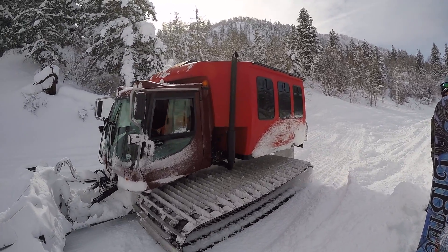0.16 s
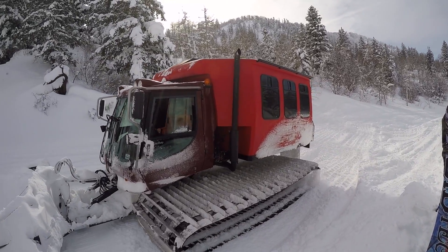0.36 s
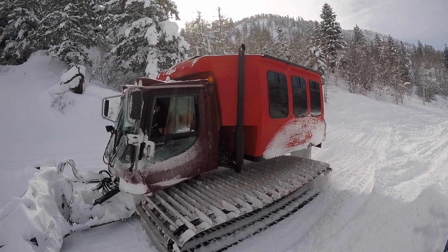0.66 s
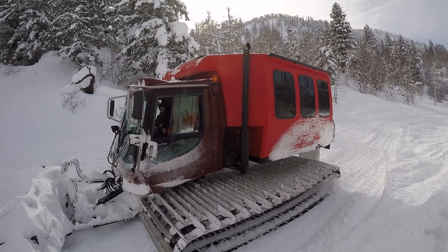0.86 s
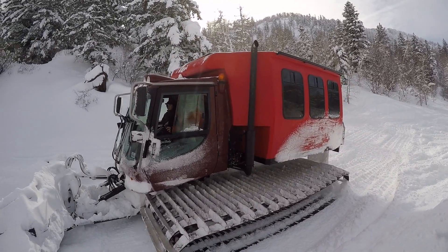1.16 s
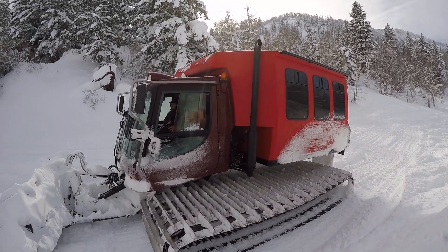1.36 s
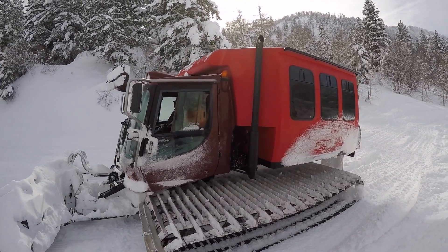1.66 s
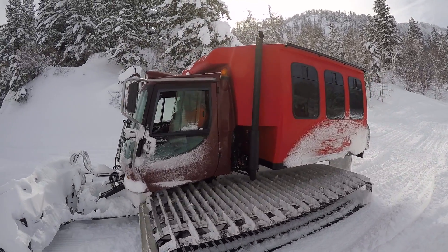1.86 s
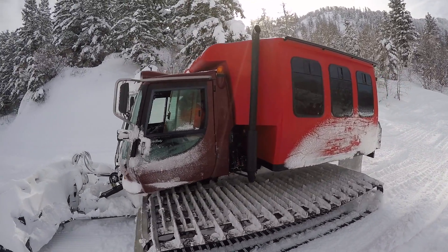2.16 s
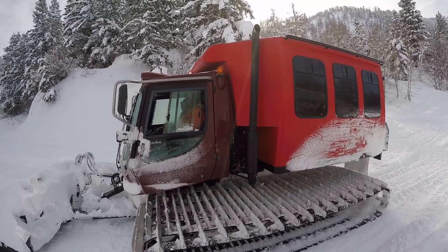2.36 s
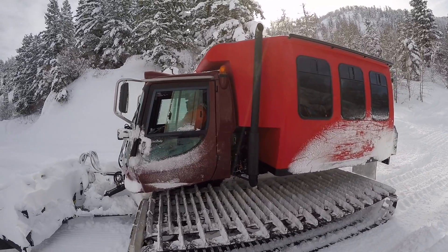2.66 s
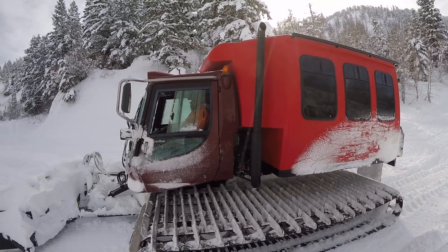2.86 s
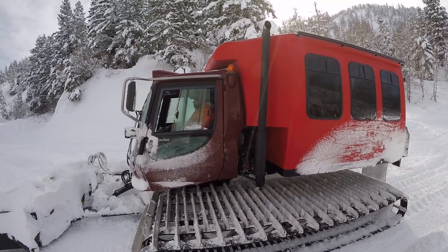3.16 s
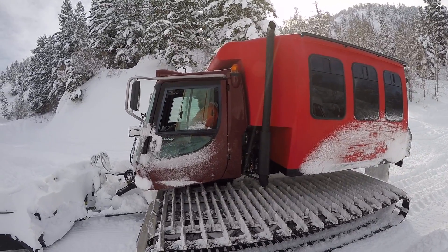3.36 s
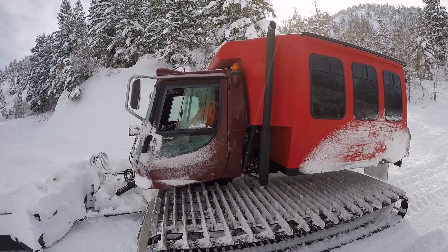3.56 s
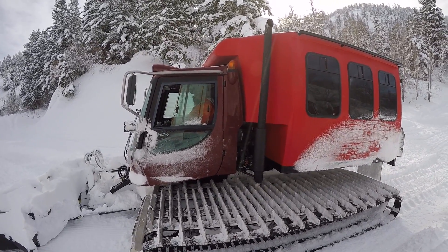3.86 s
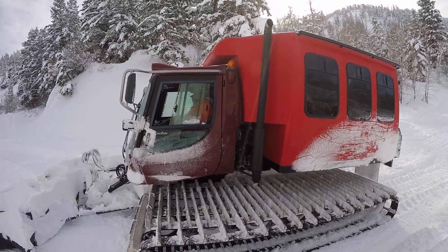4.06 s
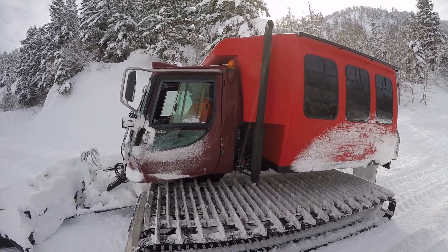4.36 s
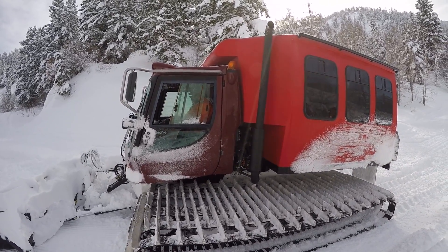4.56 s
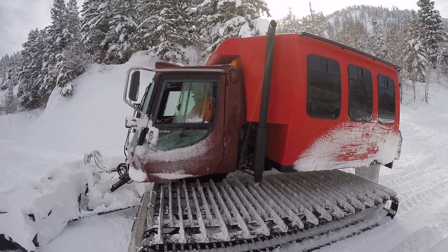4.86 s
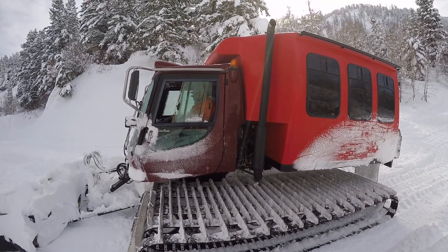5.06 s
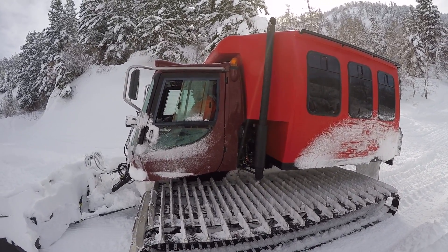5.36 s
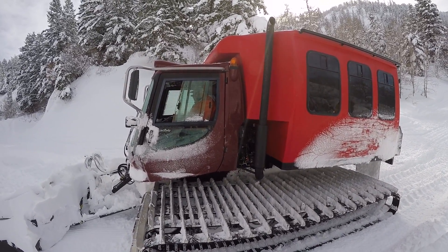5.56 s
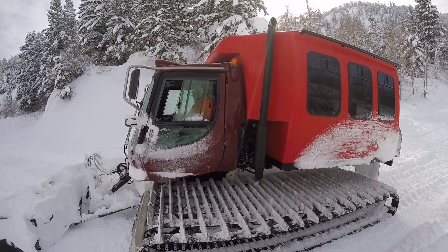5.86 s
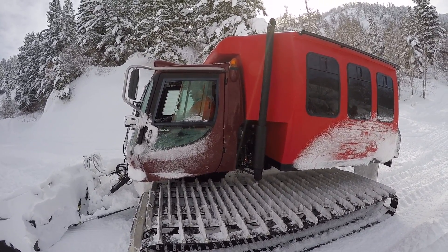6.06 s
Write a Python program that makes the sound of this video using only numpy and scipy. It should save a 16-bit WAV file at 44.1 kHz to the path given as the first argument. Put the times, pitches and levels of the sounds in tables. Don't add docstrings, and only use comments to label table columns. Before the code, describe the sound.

A large diesel tracked snow vehicle is heard close by in open air. From 0 to 2.6 seconds it runs at working revs: a low drone near 65 pulses a second, dense knocking clatter, air hiss, tracks grinding snow and a thin turbo whistle that dips, then rises as effort swells around 1.5 to 2. Small chains chatter from about 1.1, loose steel jingles after 2.1. At 2.6 to 3.1 the revs tumble and a drive whine slides downward and vanishes; the whistle dies by about 4. A softer, lumpy idle near 38 pulses continues to the end at 6.2, with scattered link clinks and a tiny snow crunch at 4.5. Throughout, deep rumble and soft thumps shake the handheld microphone; sharper plastic knocks land near 0.3, 2.15, 3.0, 3.7, 3.9, strongest at 5.05, and faintly at 6.17.

```python
import sys
import numpy as np
from scipy import signal
from scipy.fft import rfft, irfft, next_fast_len
from scipy.io import wavfile
from scipy.ndimage import uniform_filter1d, map_coordinates

SR = 44100
rng = np.random.default_rng(int(sys.argv[2]) if len(sys.argv) > 2 else 0)


def gain_from_db(level_db):
    decades = np.asarray(level_db, float) / 20
    return 10 ** decades


def to_wav(sig):
    pcm = np.clip(np.atleast_2d(sig), -1, 1) * 32767
    pcm = np.round(pcm).astype(np.int16)
    wavfile.write(sys.argv[1], SR, pcm.T)


N = 273861

# time in seconds, firings per second, exhaust level in dB, effort in dB over idle.
ENGINE = [(0, 64.3, -30, 5.5), (.35, 65.9, -28.5, 4), (.8, 63.5, -27.5, 4.5), (1.2, 64.7, -28, 6),
          (1.68, 66.2, -28.5, 9.5), (1.85, 66.4, -29.5, 10), (2.2, 66, -23.5, 7), (2.49, 66, -24.5, 7),
          (2.72, 59.3, -33, 7), (2.82, 58, -31.5, 4.5), (2.86, 56.5, -55, 2.5), (2.99, 48.6, -54, 1.2),
          (3.08, 45.4, -45, 1.5), (3.2, 42.3, -34.5, 0), (3.35, 40.2, -46, 0.5), (3.6, 38.4, -32.5, 0.5),
          (4.0, 37.5, -36, -0.1), (5.0, 37.4, -35, 0.1), (6.21, 37.4, -41.5, .3)]
CYLINDER_DB = [-0.75, -1.3, -1.9, -2.1, -1.6, -1.3]
# firings per second, gain in dB.
PIPE_GAP = [(41, 0.5), (45, -17), (56, -10), (58.5, -0.5)]
# multiple of the shaft rate, level in dB.
GEARS = [(9.76, 5), (8.08, 6.5), (14.36, -4), (15.54, 0), (18.1, -5), (18.68, -8), (22.36, -6)]
# multiple of the firing rate, level in dB.
MESH = [(19.6, 3.5), (21.9, -2), (27.4, 0), (29.5, -3), (35.9, -7)]
# middle in seconds, level in dB, half length in seconds.
FAN_BITES = [
    (1.0, -61.5, 0.18),
    (1.62, -54, 0.37),
    (2.93, -52, 0.062),
    (3.14, -48.5, 0.061),
    (3.44, -45.5, 0.23),
    (3.76, -53, 0.13),
]

# frequency in Hz, density in dB per Hz.
BLOCK_IDLE = [(290, -14.5), (500, -10.5), (656, -6.5), (714, -10), (804, -7.5), (868, -5), (994, -7.5),
              (1240, -14), (1400, 0.5), (1820, -5), (2250, -1.5), (2550, -4.5), (2900, -0.5), (3800, -16),
              (4940, -43), (8360, -120)]
# frequency in Hz, density in dB per Hz.
BLOCK_LOADED = [(290, -21), (500, -7), (573, -10.5), (667, -4.5), (771, -9.5), (1000, -2), (1220, -21),
                (1250, -10), (1410, 0), (1600, -1.5), (1930, 0), (2080, -2.5), (3130, -4.5), (3800, -20),
                (4940, -52), (8360, -120)]
# frequency in Hz, density in dB per Hz.
VALVES = [(2120, -28), (3600, -17), (4070, -0.5), (4750, 0.5), (5370, -5), (5970, -0.5), (6180, -4.5),
          (6420, -7), (6490, -9), (7000, -17.5), (9100, -35), (15400, -120)]
# time in seconds, cowl pitch in Hz, cowl level in dB,
# rocker cover pitch in Hz, rocker cover level in dB.
TURNING = [(0, 1697, -41, 4820, -47), (.35, 1766, -43, 4700, -54.5), (1.0, 1872, -44, 4600, -58),
           (1.1, 1910, -42, 4790, -47.5), (1.97, 1881, -46, 4790, -48), (2.12, 1927, -44, 4520, -57),
           (2.78, 2029, -46, 4500, -68), (2.95, 1992, -47.5, 4150, -53.5), (4.2, 1984, -45, 4200, -53),
           (5.2, 2040, -46, 4380, -51), (6.21, 2031, -47, 4370, -51)]
# frequency in Hz, density in dB per Hz.
HISS = [(3820, -17.5), (6500, -6), (7030, -5), (7800, -2), (8870, -10), (10600, -11.5), (13200, -18),
        (15200, -17.5)]
# frequency in Hz, density in dB per Hz.
TRACK = [(76, -44), (130, -3.5), (177, -5.5), (382, -10.5), (440, -15), (515, -22), (969, -15.5),
         (1200, -19.5), (1560, -71), (2640, -120)]
# middle in seconds, level in dB, half length in seconds.
SURGES = [
    (.19, -43, 0.31),
    (1.35, -49.5, 0.17),
    (1.75, -40, 0.35),
    (2.6, -55, 0.074),
    (3.0, -53, 0.18),
]
# middle in seconds, level in dB, half length in seconds.
LINKS = [
    (1.4, -65, .25),
    (1.7, -63, .1),
    (2.3, -51.5, 0.21),
    (2.7, -58, 0.18),
    (3.0, -71, .08),
]

# frequency in Hz, level in dB.
PANELS = [(974.5, -60.5), (1870, -64.5), (2021, -60)]
# time in seconds, whistle pitch in Hz.
TURBO = [(0, 6690), (.33, 6700), (.45, 6590), (.76, 6190), (1.1, 5890), (1.37, 5900), (1.55, 6030),
         (1.9, 6350), (2.06, 6415), (2.36, 6060), (2.75, 5650), (3.15, 5080), (3.45, 4600), (3.8, 4350)]
# time in seconds, pitch in Hz, level in dB.
WHINE = [(2.55, 2262, -60), (2.6, 2240, -44.5), (2.65, 2195, -50), (2.7, 2160, -44.5), (2.73, 2145, -48),
         (2.79, 2120, -42), (2.83, 2070, -46), (2.87, 1975, -43), (2.92, 1870, -45), (2.95, 1810, -50),
         (3.0, 1738, -50), (3.08, 1639, -62)]
# centre in Hz, width in Hz, lift in dB.
DUCT = [(6160, 60, 15), (6260, 70, -5), (6350, 50, 12), (6412, 30, -5), (6050, 40, 5), (5700, 150, -4),
        (5900, 100, 2), (6580, 100, 4), (6700, 60, 0), (4600, 200, 10)]

# frequency in Hz, density in dB per Hz.
DEEP = [(4.7, -33), (8.0, 5), (27, 0), (70, -21.5), (91, -68), (150, -120)]
# frequency in Hz, density in dB per Hz.
UPPER = [(29, -11.5), (50, 2), (86, -7), (103, -10), (156, -16.5), (200, -27), (260, -54), (440, -120)]
# middle in seconds, deep level in dB, upper level in dB.
GUSTS = [(.05, -45, -23), (.22, -18, -32), (.33, -18, -17), (0.431, -18, -28), (.64, -25, -17),
         (1.0, -20, -34), (1.28, -34, -36), (1.73, -25, -29), (1.97, -26, -46), (2.09, -28, -35),
         (2.31, -18, -26), (2.61, -37, -20), (2.73, -44, -45), (2.882, -18.5, -38), (3.1, -26, -48),
         (3.3, -24, -39), (3.53, -20, -49), (3.682, -10, -28), (3.95, -24, -31), (4.1, -25, -30),
         (4.24, -18.5, -41), (4.4, -34, -42), (4.599, -58, -43), (4.8, -38, -52), (5.07, -3.5, -29),
         (5.33, -21, -44), (5.5, -24, -34), (5.621, -26, -50), (5.82, -36, -48), (6.2, -17, -23)]
# time in seconds, pitch in Hz, level in dB.
SIZZLE = [(0, 12300, -72), (.4, 12000, -82), (1.1, 10800, -73), (1.6, 10200, -73), (1.92, 10700, -67),
          (2.3, 10600, -76), (2.6, 12200, -76), (3.3, 12300, -74), (4.6, 12000, -77), (5.2, 12400, -68),
          (5.45, 12500, -70), (5.6, 12700, -80), (6.21, 12500, -80)]
# frequency in Hz, density in dB per Hz.
FLOOR = [(4120, -36), (7000, -3), (7540, -1), (8130, -3), (10500, -3.5), (12000, -4.5), (13400, -5),
         (14700, -8), (15200, -7.5)]

# middle in seconds, level in dB, pitch in Hz, signed direction.
THUMPS = [(.222, -8, 24, -1), (.327, -3, 48.8, 0.91), (0.424, -6, 31.8, 1), (.65, -8.5, 49.5, 0.91),
          (1.027, -8.5, 30, -0.97), (1.744, -9.5, 45, 0.97), (2.265, -8, 28, 1), (3.272, -11, 60, -1),
          (3.92, -9, 100.2, 1), (5.0525, -12.5, 110, 1), (5.334, -14.5, 39.6, -0.87),
          (0.989, -4, 34.72, -0.65), (1.273, -3, 35, 0.51), (2.325, -0.5, 42.38, 0.74),
          (3.014, -5.5, 68, 0.48), (3.298, -14, 69, -0.95), (3.677, -8.5, 70, 1), (3.685, -6, 60, -1),
          (4.251, -13.5, 45.37, 0.78), (5.06, -5, 61.5, 0.79), (5.068, -6.5, 59.2, -1.3),
          (5.09, -7, 39.8, 0.96), (5.508, -11, 75, 0.97), (5.516, -3.5, 54.5, -0.5), (6.18, -7, 80, -1.02),
          (6.189, -17, 60.1, 0.78)]
# start in seconds, push level in dB, push pitch in Hz, dull tick level in dB,
# bright tick level in dB.
KNOCKS = [(.2955, -8, 110, -30, -42), (.7205, -20, 110, -40, -45), (2.1385, -6, 110, -27, -36),
          (2.1585, -6, 110, -25, -38), (3.0082, -19, 200, -17.5, -45), (6.174, -23, 100, -46, -55),
          (3.6698, -16, 170, -33, -26), (3.9168, -7, 104, -22.5, -26), (5.033, .6, 112, -28, -24.5),
          (5.0513, -6.5, 125, -21, -38), (5.0565, -26, 150, -34, -40)]
# centre in Hz, width in Hz, level in dB.
SHELL = [(760, 550, 1.5), (1400, 500, -11)]
# centre in Hz, width in Hz, level in dB.
LATCH = [(2100, 600, 2), (3750, 330, 7), (6200, 800, -19)]
# start in seconds, level in dB, pitch in Hz.
SNAPS = [(3.6694, -17, 1880), (3.6725, -26, 1900), (3.9163, -21, 2370), (5.0318, -24, 2150),
         (5.0498, -24, 2450), (5.0555, -29, 2450), (5.07, -33, 2000), (3.9155, -11, 500),
         (5.0313, -13, 450), (5.0497, -13, 520), (.2942, -18, 480), (2.1372, -17, 480), (2.1572, -17, 480)]

# start in seconds, peak level in dB, pitch in
# Hz.
JINGLES = [(2.128, -33, 4650), (2.2048, -30, 4550), (2.3236, -30, 4500), (2.4943, -29.5, 4600),
           (2.6875, -29.5, 4520), (4.349, -34, 4200), (5.0936, -34, 4160), (5.1751, -35, 4190),
           (5.2546, -32, 4520), (5.3676, -33, 4510), (5.5757, -38, 4420), (6.0325, -34.5, 4280),
           (1.6781, -36, 4370), (1.8223, -37, 4100), (2.2503, -34, 4080), (2.4065, -40, 4180),
               (2.9767, -38, 4140), (3.1019, -33.5, 4180), (3.244, -36, 4130), (3.3453, -39, 4180),
               (3.3967, -37, 4150), (3.4965, -33, 4190), (3.7295, -39, 4140), (3.8646, -41, 4300),
               (3.9739, -43.5, 4130), (4.1066, -41, 4150), (4.668, -39, 4610), (4.8773, -39, 4480),
               (4.9317, -36, 4270), (5.229, -34, 4350), (5.7359, -38, 4200), (5.8715, -41, 4380),
               (6.1614, -34, 4430),
           (1.0876, -37, 4770), (1.1196, -29, 4700), (1.2957, -31, 4790), (1.3545, -37, 4970),
          (1.4463, -37, 4770), (1.4942, -34, 4910), (1.5381, -35, 4830), (1.6094, -36, 4750),
          (1.6723, -31, 4930), (1.7496, -36, 4910), (1.825, -35, 4740), (1.9033, -36, 4820)]
# middle in seconds, level in dB, length in seconds, lowest frequency in Hz.
CRUNCH = [
    (2.61, -60, .035, 13500),
    (2.827, -48, .0015, 5500),
    (4.512, -41, 0.0032, 1800),
    (4.517, -36, 0.0065, 1776),
]
DULLED_S = [2.876, 3.476, 3.66, 3.906, 4.01, 4.24, 5.005, 5.51, 6.18]


def unit(x):
    return x / np.sqrt(np.mean(x ** 2) + 1e-20)


def curves(rows):
    s, *cols = np.transpose(rows)
    return [np.interp(np.arange(N) / SR, s, c) for c in cols]


def wobble(rate_hz):
    knots = rng.standard_normal(int(N * rate_hz / SR) + 4)
    return map_coordinates(knots, [np.arange(N) * rate_hz / SR])


def filtered(x, response):
    m = next_fast_len(N + SR // 2)
    return irfft(rfft(x, m) * response(np.fft.rfftfreq(m, 1 / SR)), m)[:N]


def coloured(x, spectrum):
    f, db = np.transpose(spectrum)
    return unit(filtered(x, lambda hz: gain_from_db(np.interp(np.log(hz + 1), np.log(f + 1), db))))


def patchy(depth_db):
    z = signal.stft(rng.standard_normal(N), nperseg=512)[2]
    field = uniform_filter1d(rng.standard_normal(z.shape), 5, 0)
    field = uniform_filter1d(field, 7, 1)
    return signal.istft(z * gain_from_db(depth_db * unit(field)), nperseg=512)[1][:N]


def tone(turns, unsteady_db, drift_rad):
    level = np.sqrt(2) * gain_from_db(unsteady_db * wobble(9))
    return level * np.sin(2 * np.pi * turns + drift_rad * wobble(14))


def ridge(drive, hz, width_hz):
    def slow():
        return filtered(drive * rng.standard_normal(N), lambda f: 1 / (1 + 2j * f / width_hz) ** 2)

    phase = 2 * np.pi * np.cumsum(hz) / SR
    return unit(slow() * np.cos(phase) + slow() * np.sin(phase))


def modes(x, table):
    def ring(f):
        return sum(gain_from_db(db) * 1j * f * w / (c * c - f * f + 1j * f * w) for c, w, db in table)

    return filtered(x, lambda f: ring(f) / (1 + 1j * f / 5000) ** 3)


def swells(rows, floor_db, order):
    t = np.arange(N) / SR
    return gain_from_db(floor_db) + sum(gain_from_db(db) * np.exp(-np.abs((t - s) / half_s) ** order) for s, db, half_s in rows)


def engine_effort_db():
    return curves(ENGINE)[2]


def pulling():
    return np.clip((curves(ENGINE)[0] - 45) / 18, 0, 1)


def beat(firings, floor, decay, scatter_db):
    index = np.floor(firings).astype(int)
    size_db = np.take(CYLINDER_DB, index % len(CYLINDER_DB))
    size_db = size_db + scatter_db * rng.standard_normal(N // 100)[index - index[0]]
    u = firings % 1
    return floor + gain_from_db(size_db) * (1 - np.exp(-u / 0.096)) * np.exp(-u / decay)


def exhaust(firings):
    rate, boom_db, effort_db = curves(ENGINE)
    third_db = -54.5 + 14 * np.interp(rate, [38.8, 56.6], [0, 1])
    fourth_db = -49.5 + 0.45 * effort_db + np.interp(rate, *np.transpose(PIPE_GAP))
    boom = tone(2 * firings, 0.58, 0.2) + gain_from_db(-1.5) * tone(firings, 1.8, 0.37)
    third = gain_from_db(third_db) * tone(3 * firings, 1.5, 0.2)
    fourth = gain_from_db(fourth_db) * tone(4 * firings, 1.5, 0.2)
    return gain_from_db(boom_db) * boom + third + fourth


def fan_and_gears(firings):
    effort_db = engine_effort_db()
    shaft = firings / len(CYLINDER_DB) * 2
    gears = sum(gain_from_db(db) * tone(k * shaft, 1.3, 0.15) for k, db in GEARS)
    mesh = sum(gain_from_db(db) * tone(k * firings, 5.9, 0.44) for k, db in MESH)
    fan = swells(FAN_BITES, -63.5, order=6) * tone(19.7 * shaft, 2.2, 0.07)
    return gain_from_db(-66.5 + 1.56 * effort_db) * gears + gain_from_db(-74 + 1.96 * effort_db) * mesh + fan


def clatter(firings):
    effort_db, load = engine_effort_db(), pulling()
    cowl_hz, cowl_db, cover_hz, cover_db = curves(TURNING)
    knock = beat(firings, 0.74, 0.23, 0.4) * patchy(1.0)
    block = load * coloured(knock, BLOCK_LOADED) + (1 - load) * coloured(knock, BLOCK_IDLE)
    valves = coloured(beat(firings, 1.0, 0.27, 5.1) * patchy(1.5), VALVES)
    cowl = ridge(beat(firings, 0.36, 0.32, 3.5), cowl_hz, 470)
    alternation_db = 0.89 * np.cos(np.pi * firings)
    cover_drive = beat(firings, 0.033, 0.77, 1.6) * gain_from_db(1.2 * wobble(21.9) + alternation_db)
    cover = ridge(cover_drive, cover_hz, 520)
    core = gain_from_db(-44 + effort_db) * block + gain_from_db(-53 + 0.95 * effort_db) * valves
    return core + gain_from_db(cowl_db) * cowl + gain_from_db(cover_db) * cover


def air_hiss(firings):
    hiss = coloured(beat(firings, 0.83, 0.29, 5.4) * patchy(1.0), HISS)
    return gain_from_db(-63 + engine_effort_db() + 1.3 * pulling()) * hiss


def tracks():
    grind = coloured(gain_from_db(1.0 * wobble(25)) * patchy(0.43), TRACK)
    links = ridge(gain_from_db(2.56 * wobble(35)), np.full(N, 4110), 220)
    return swells(SURGES, -51.5, order=2) * grind + swells(LINKS, -89, order=2) * links


def panels(firings):
    t = np.arange(N) / SR
    hum = sum(gain_from_db(db) * tone(hz * t, 0.92, 0.16) for hz, db in PANELS)
    since = (firings - 1.1) % len(CYLINDER_DB)
    ping = 0.04 + since * np.exp(-since / 0.3) * 4
    return hum + gain_from_db(-38.5) * ping * tone(1430 * t, 2.2, 0.4)


def ducted_whistle(hz, db, flicker_db):
    hz = uniform_filter1d(hz, size=2000)
    db = db + sum(lift_db / (1 + (2 * (hz - c) / w) ** 2) for c, w, lift_db in DUCT)
    db = db + flicker_db * wobble(35) + 0.8 * wobble(11)
    return gain_from_db(db) * tone(np.cumsum(hz) / SR, 0.29, 0.76)


def turbo():
    fade_s = np.maximum(np.arange(N) / SR - 3.55, 0)
    boost_db = np.minimum(engine_effort_db(), 8.3)
    return ducted_whistle(curves(TURBO)[0], -74.5 + 2.1 * boost_db - 70 * fade_s, 3.3)


def buffet():
    half_s, load = 0.036, pulling()
    deep_gusts = [(s, db, half_s) for s, db, _ in GUSTS]
    upper_gusts = [(s, db, 0.49 * half_s) for s, _, db in GUSTS]
    deep_gain = swells(deep_gusts, -22.5 + 1.5 * load, order=2)
    upper_gain = swells(upper_gusts, -34 + 4.5 * load, order=2)
    lumps = wobble(12)
    deep = coloured(rng.standard_normal(N), DEEP)
    deep = deep / np.sqrt(np.abs(uniform_filter1d(deep ** 2, size=5000)) + 0.082)
    upper = coloured(rng.standard_normal(N), UPPER)
    upper = upper / np.sqrt(np.abs(uniform_filter1d(upper ** 2, size=2500)) + 0.3)
    return deep_gain * gain_from_db(0.51 * lumps) * deep + upper_gain * gain_from_db(2.1 * lumps) * upper


def sizzle():
    hz, db = curves(SIZZLE)
    return gain_from_db(db) * ridge(gain_from_db(1.2 * wobble(8)), uniform_filter1d(hz, size=4000), 1000)


def microphone_hiss():
    return gain_from_db(-60.0) * coloured(rng.standard_normal(N), FLOOR)


def thumps():
    out, t = np.zeros(N + SR), np.arange(SR // 20) / SR
    middle_s = t[-1] / 2
    for s, db, hz, direction in THUMPS:
        u = (t - middle_s) * hz
        swing = np.sin(2 * np.pi * u) * np.exp(-(u / 0.42) ** 2)
        out[round((s - middle_s) * SR):][:len(t)] -= direction * gain_from_db(db - 1.5) * swing
    return out[:N]


def push(u):
    decay = np.exp(-u / 0.75 - u ** 4)
    onset = 1 - np.exp(-(u / 0.09) ** 2)
    return 1.3 * np.sin(2 * np.pi * u ** 0.63) * decay * onset


def knocks():
    out, dull, bright = np.zeros((3, N + SR))
    t = np.arange(SR // 20) / SR
    for s, db, hz, dull_db, bright_db in KNOCKS:
        out[round(s * SR):][:len(t)] += gain_from_db(db) * push(t * hz)
        tick = gain_from_db(23 - 60 * t / 0.006) * ((t == 0) + 0.07 * rng.standard_normal(len(t)))
        dull[round((s - 0.001) * SR):][:len(t)] -= gain_from_db(dull_db) * tick
        bright[round((s - 0.0012) * SR):][:len(t)] += gain_from_db(bright_db) * tick
    return out[:N] + modes(dull[:N], SHELL) + modes(bright[:N], LATCH)


def snaps():
    out, t = np.zeros(N + SR), np.arange(SR // 50) / SR
    t60_s = 0.0092
    for s, db, hz in SNAPS:
        envelope = gain_from_db(db - 60 * t / t60_s) * (1 - np.exp(-t * hz))
        out[round(s * SR):][:len(t)] += envelope * np.sin(2 * np.pi * hz * t)
    return out[:N]


def loose_steel():
    out, t = np.zeros(N + SR), np.arange(SR // 20) / SR
    swell = t / 0.0094 * np.exp(1 - t / 0.0068)
    for s, db, hz in JINGLES:
        contacts = unit(uniform_filter1d(rng.standard_normal(len(t)), size=50))
        ring = swell * (1 + 0.57 * contacts) * np.sin(2 * np.pi * hz * t)
        out[round(s * SR):][:len(t)] += gain_from_db(db - 5.0) * ring
    return out[:N]


def gear_whine():
    before = (WHINE[0][0] - 0.05, WHINE[0][1], -90)
    after = (WHINE[-1][0] + 0.05, WHINE[-1][1], -120)
    hz, db = curves([before] + WHINE + [after])
    return ducted_whistle(hz, db, 1.2)


def crunch():
    t, out = np.arange(N) / SR, 0
    for s, db, length_s, low_hz in CRUNCH:
        grains = rng.standard_normal(N) * gain_from_db(5.5 * wobble(700))
        colour = [(low_hz / 2, -40), (low_hz, 0), (2.1 * low_hz, -7), (4 * low_hz, -21), (8 * low_hz, -36)]
        out = out + gain_from_db(db) * np.exp(-((t - s) / length_s) ** 2) * coloured(grains, colour)
    return out


def scene():
    firings = np.cumsum(curves(ENGINE)[0]) / SR
    firings = firings - firings[round(5.2545 * SR)]
    machine = exhaust(firings) + fan_and_gears(firings) + clatter(firings) + air_hiss(firings) + tracks()
    machine = machine + panels(firings) + turbo() + loose_steel() + gear_whine()
    hands = thumps() + knocks() + snaps()
    grip = uniform_filter1d(np.abs(hands), size=1500)
    shaking = buffet() / (1 + 20 * grip)
    return (machine + shaking + sizzle() + microphone_hiss() + hands + crunch())[None]


def top_cut(x):
    return signal.sosfilt(signal.butter(12, 15400, fs=SR, output="sos"), x)


def record(dry):
    x = filtered(dry[0], lambda hz: hz < 15350)
    dulled = np.minimum(swells([(s, 0, 0.016) for s in DULLED_S], -99, order=4), 1)
    x = x - 0.8 * dulled * filtered(x, lambda hz: np.clip((hz - 12600) / 1200, 0, 1))
    x = x / (1 + np.abs(x / 1.05) ** 8) ** (1 / 8)
    return top_cut(x[None])


dry = scene()
out = record(dry)
to_wav(out)
```